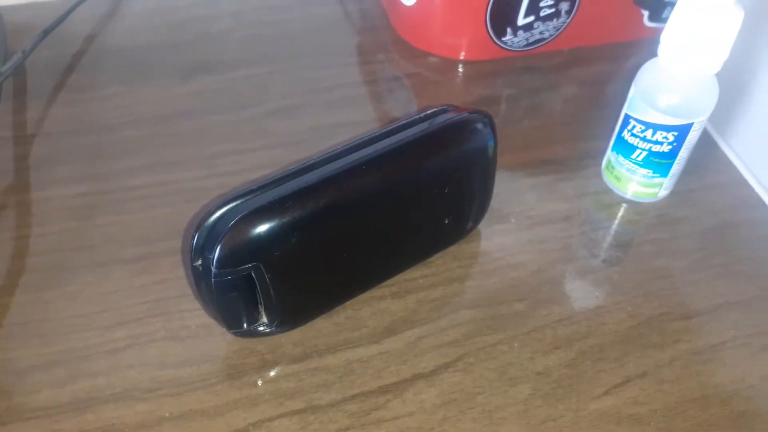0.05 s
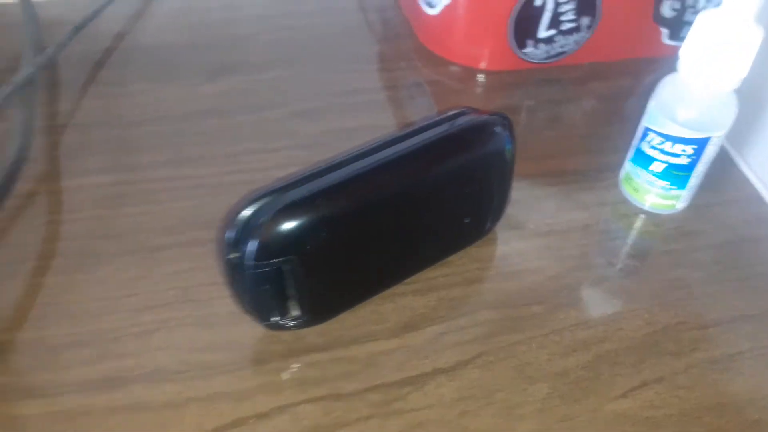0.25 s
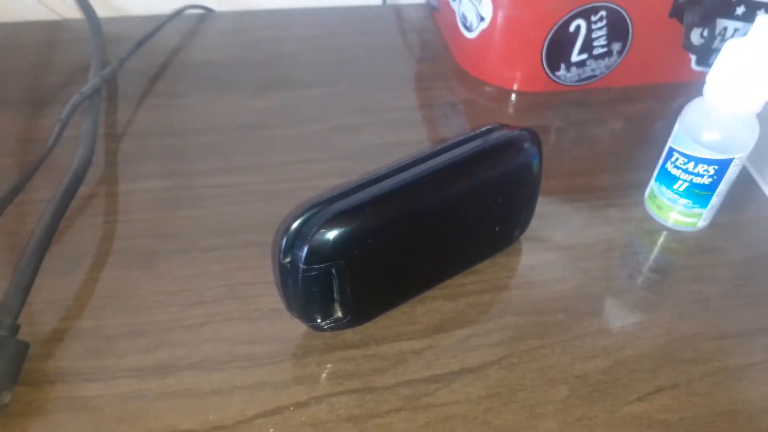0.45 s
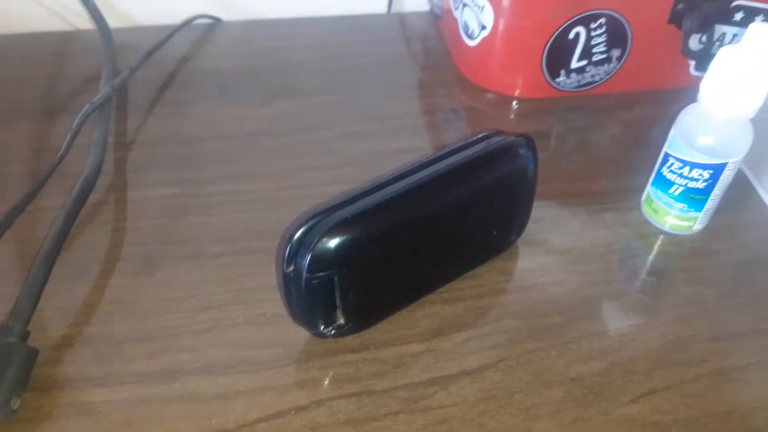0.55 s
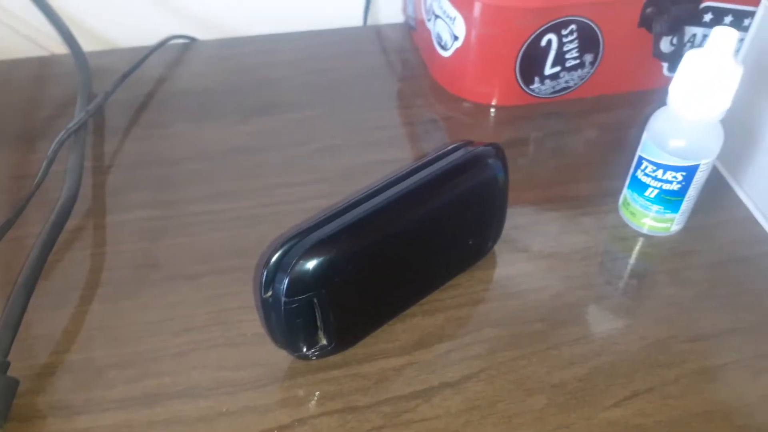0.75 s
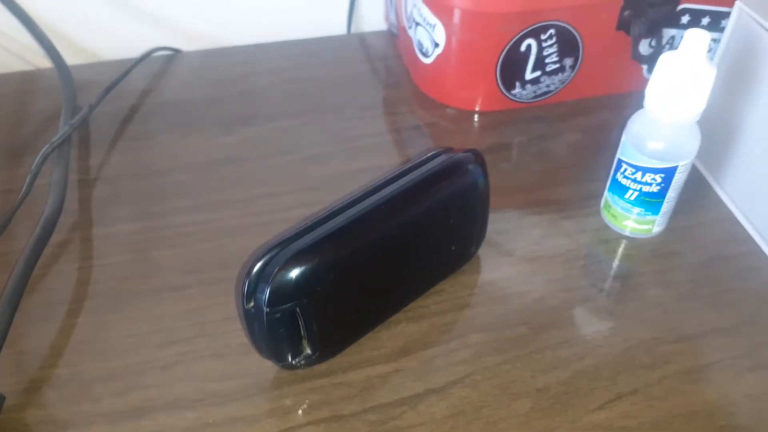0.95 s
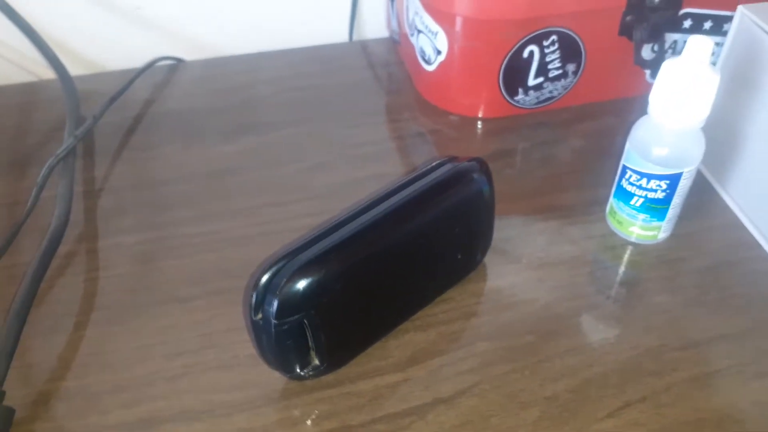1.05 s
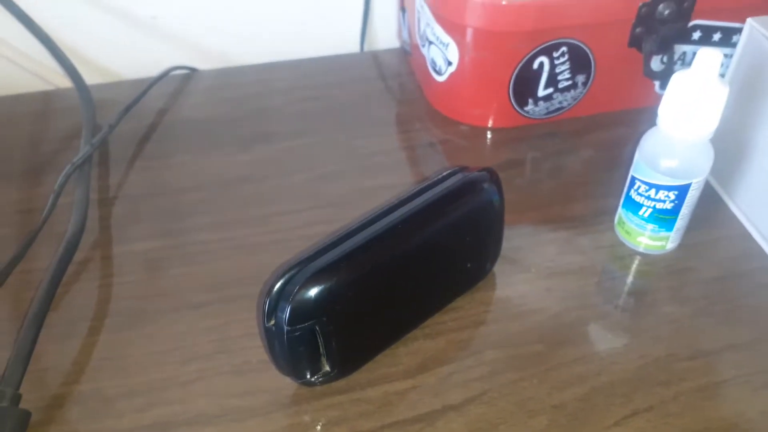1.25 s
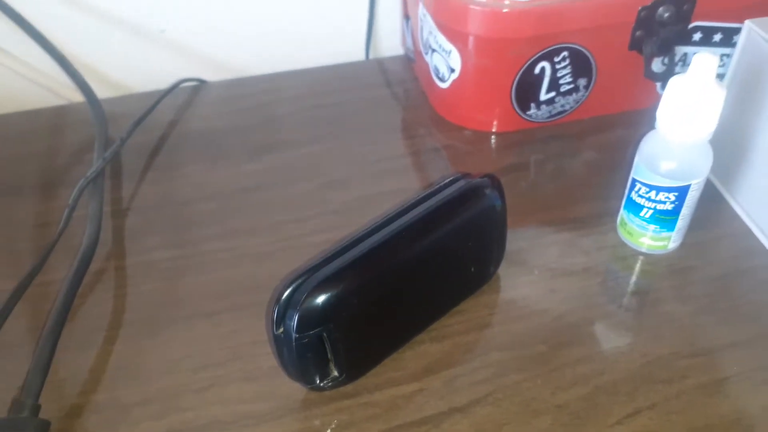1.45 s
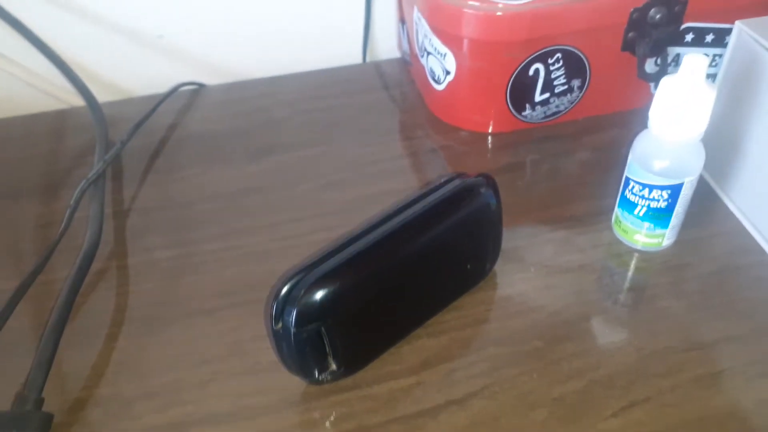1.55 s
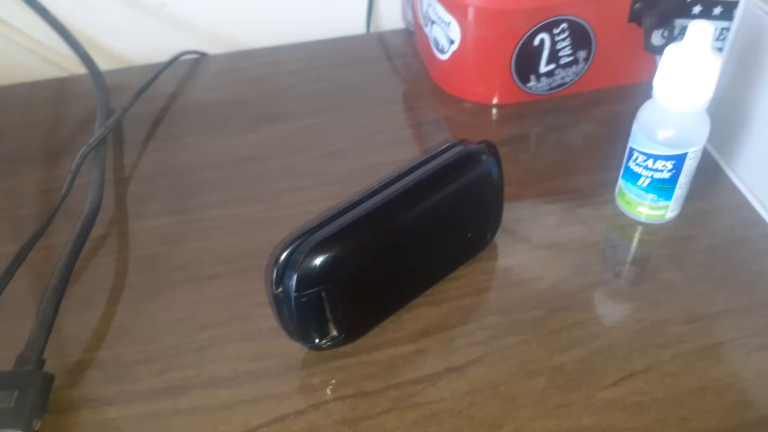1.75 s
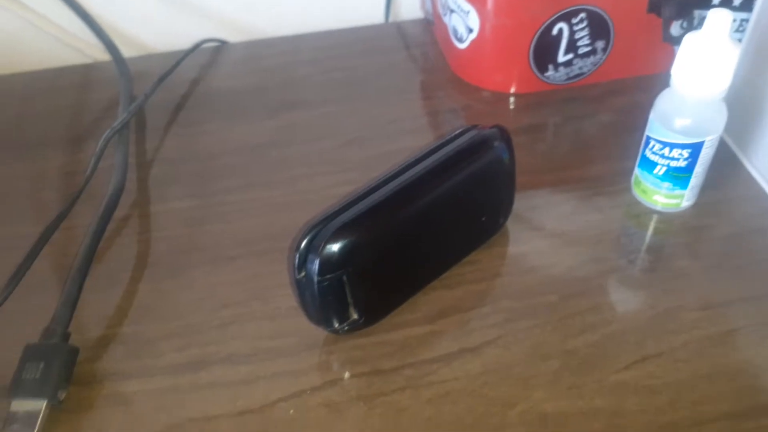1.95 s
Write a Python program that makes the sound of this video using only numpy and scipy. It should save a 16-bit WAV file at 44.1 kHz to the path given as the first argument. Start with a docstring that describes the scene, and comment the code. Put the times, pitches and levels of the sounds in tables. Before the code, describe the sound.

A phone vibrates on a wooden table with a low hum and light plastic rattle, and a sharp knock hits the wood. The buzz winds down, pauses, then returns with a second knock, heard close in a quiet small room.

```python
"""A plastic phone vibrates on a wooden table in a small room, coasts to a stop, then starts again.
Its off-centre motor is a rotating unbalance: it forces the tabletop to hum and rumble, and the case
to chatter once per turn, while the brushes hiss during each change of speed.
Two sharp knocks excite the free vibration of the wood and briefly fill the room with reverberation.
A quiet room tone lies beneath."""
import sys
import numpy as np
from scipy import signal
from scipy.fft import rfft, irfft
from scipy.io import wavfile

SR = 44100
rng = np.random.default_rng(int(sys.argv[2]) if len(sys.argv) > 2 else 0)


def materialize(psi):
    """Save the field psi as 16-bit PCM at rate SR to the path in sys.argv[1].

    A 1-D psi becomes a single channel; in a 2-D psi each row is a channel.
    """
    bounded = np.clip(np.atleast_2d(psi).T, -1, 1)
    quanta = np.round(bounded * 32767).astype(np.int16)
    wavfile.write(sys.argv[1], SR, quanta)


N = 88200
TIME = np.arange(N) / SR

# runs of the motor: (on [s], off [s], hum drive [dB], overtones [dB], chatter [dB])
MOTOR_RUNS = [(-.5, .7, -36, -54.5, -57.5), (1.642, 2.3, -42.5, -56, -58.5)]
# drift of the motor's full speed: (time [s], speed [turns/s])
FULL_SPEED = [(0, 230), (.045, 231.8), (.19, 231.7), (.36, 230.4), (.44, 229.2), (.53, 229.6), (.63, 232.2),
              (.69, 229.5), (1.7, 237), (1.84, 236.4), (2, 235.5)]
# overtones of the shaking: (multiple of the speed [1], level [dB])
HARMONICS = [(2, 0), (3, -9.5), (4, -17.5), (5, -37.5)]
# spectrum of the shaken table: (frequency [Hz], level [dB])
RUMBLE_SPECTRUM = [(35, -28), (60, -7.5), (115, -1), (170, -1), (330, -4.5), (480, -7.5), (800, -20),
                   (1500, -35)]
# spectrum of the chattering case: (frequency [Hz], level [dB])
CASE_SPECTRUM = [(600, -25.5), (1100, -12), (1400, -13), (1700, -5.5), (2090, 7.5), (2500, -4.5),
                 (3300, -1.5), (5000, -9.5), (7800, -7), (9200, -21.5), (10500, -28.5), (12500, -15),
                 (16000, -16.5)]
# resonances of the case: (frequency [Hz], bandwidth [Hz], level [dB])
CASE_RESONANCES = [(1890, 90, -13.5), (2113, 150, -11), (2600, 120, -13), (3237, 75, -14),
                   (3430, 110, -13.5), (3810, 110, -18), (4370, 290, -19.5), (4880, 480, -17.5),
                   (6540, 200, -19), (8430, 170, -22)]
# balance of the case: (frequency [Hz], left over right [dB])
CASE_BALANCE = [(700, -3), (1300, -9), (2300, -1), (4400, -10), (8000, -8), (13000, 2.5)]
# swell of the chatter: (time [s], level [dB])
CHATTER_SWELL = [(0, 3), (.16, 4.5), (.36, 1), (.5, 0), (.6, 2.5), (.7, 0.5), (1.84, 0.5), (2, -3)]
# spectrum of the motor brushes: (frequency [Hz], level [dB])
BRUSH_SPECTRUM = [(600, -20.5), (2000, -15), (3000, -1.5), (4500, -3), (7000, 6), (8200, -1), (9800, -25),
                  (13000, -6), (16000, -24)]
# spectrum of the room tone: (frequency [Hz], level [dB])
ROOM_TONE_SPECTRUM = [(18, -48.5), (30, -23.5), (41, -13), (75, -2), (199, -14), (245, -21), (336, -4),
                      (415, -14.5), (616, -20.5), (721, -38), (2610, -33.5), (3870, -39), (16000, -45.5)]
# likeness of diffuse sound at the two ears: (frequency [Hz], coherence [0-1])
COHERENCE = [(100, 0.8), (350, .85), (700, 0), (1500, 0.1), (3000, 0.09)]
# knocks: (time [s], thud and modes [dB], thud frequency [Hz], crack [dB], room [dB])
IMPACTS = [(0.2212, -2.5, 266.8, -14.5, -21), (1.6947, -1.5, 241.3, -15.5, -15)]
# modes of the table: (frequency [Hz], level [dB], T60 [s])
TABLE_MODES = [(95.33, -21, 0.15), (139.7, -27.5, .2), (287.6, -26, .11), (368.4, -21.5, 0.21),
               (466.5, -2, 0.027), (491, -24.5, .27), (586.5, -20, 0.082), (696, -22, 0.072),
               (1176, -34, 0.16), (1506, -23.5, 0.037), (1790, -28.5, 0.1), (2637, -19.5, 0.044),
               (3736, -34.5, 0.1)]
# crack of the contact: (frequency [Hz], level [dB], T60 [s])
CRACK_DECAY = [(60, -30, .04), (300, -10, 0.068), (700, 2, .04), (1500, 7, 0.032), (2310, -2.5, 0.027),
               (2800, 8.5, 0.023), (4540, 0, 0.018), (7330, -4, 0.019), (9600, -34.5, 0.037),
               (14000, -14.5, 0.02), (16000, -22, .012)]
# balance of the crack: (frequency [Hz], left over right [dB])
CRACK_BALANCE = [(1200, -1), (2800, -4.5), (7000, -4.5), (11000, 6.5)]
# reverberation of a knock: (frequency [Hz], level [dB], T60 [s])
ROOM_DECAY = [(40.3, -16, 0.13), (80, 4.5, .3), (180, 2.5, 0.084), (295, 14, 0.24), (497, 4.5, .25),
              (790, -12, 0.34), (1500, -6.5, 0.29), (2830, -12.5, .23), (4430, -19.5, 0.23),
              (7526, -25, .2), (9300, -47, 0.32), (15000, -36, .16)]

SPIN_UP_S, COAST_S = 0.029, 0.18
# each amplitude grows as speed to this power
HUM_POWER, OVERTONE_POWER, CHATTER_POWER, BRUSH_POWER = 7.6, 2.44, 2.54, 0.21
TABLETOP_HZ, TABLETOP_WIDTH_HZ = 225.9, 22
WHINE_MULTIPLE, WHINE_HZ, WHINE_WIDTH_HZ, WHINE_DB = 9, 2141, 110, -10.5
TAP_SPREAD_DB, TAP_JITTER_S, CASE_T60_S, SCRAPE_DB = 2.8, .000011, .028, -3
RUMBLE_DB, BRUSH_DB = -53.5, -61.5
ROOM_TONE_DB, ROOM_TONE_PAN_DB = -64, -7.5
THUD_LAG_S, THUD_SWELL_S, THUD_T60_S = .0013, .003, 0.069
CONTACT_S, ROOM_BUILD_S = 0.00082, 0.0034
KNOCK_PAN_DB, RIGHT_LAG_S = -2.5, 0.00022
LOW_CUT_HZ, HIGH_CUT_HZ = 55, 16000


def from_db(db):
    """Amplitude ratio: a factor of ten per 20 dB."""
    return 10 ** (np.asarray(db) / 20)


def unit_rms(x):
    """Normalisation to unit mean power."""
    return x / np.sqrt(np.mean(x ** 2) + 1e-20)


def at_hz(points, hz, column=1):
    """Interpolation of a table column over log frequency."""
    table = np.array(points, float)
    return np.interp(np.log(np.maximum(hz, 1)), np.log(table[:, 0]), table[:, column])


def pan(db):
    """Interaural level difference as left and right gains."""
    return from_db(np.array([[.5], [-.5]]) * db)


def fade(age, t60):
    """Damping: exponential decay by 60 dB in t60 seconds."""
    return np.exp(-np.log(1000) * age / t60)


def colour(x, spectrum):
    """Zero-phase filtering by multiplication of spectra."""
    hz = np.arange(N + 1) * SR / (2 * N)
    return irfft(rfft(x, 2 * N) * from_db(at_hz(spectrum, hz)))[..., :N]


def place(x, balance):
    """Interaural level difference that varies with frequency."""
    return np.array([colour(side, [(hz, share * db) for hz, db in balance])
                     for side, share in zip(x, (.5, -.5))])


def diffuse_noise(spectrum):
    """Diffuse field: coloured noise, coherent between the ears at long wavelengths; rms 1."""
    coherence = np.clip(at_hz(COHERENCE, np.arange(N // 2 + 1) * SR / N), 0, 1)
    mid, side = rfft(rng.standard_normal((2, N)))
    ears = irfft(np.sqrt(1 + coherence) * mid + np.sqrt(1 - coherence) * side * [[1], [-1]])
    return unit_rms(colour(ears, spectrum))


def decaying_noise(table, age):
    """Frequency-dependent damping: each half-octave band of noise decays at its own rate."""
    spectrum = rfft(diffuse_noise(table))
    hz = np.arange(N // 2 + 1) * SR / N
    edges = 30 * 2 ** np.arange(0, 10, .5)
    sound = 0
    for low, high in zip(edges, edges[1:]):
        band = irfft(spectrum * ((hz >= low) & (hz < high)))
        sound += band * fade(age, at_hz(table, np.sqrt(low * high), column=2))
    return sound * (age > 0)


def resonate(x, hz, width_hz):
    """Forced response of a damped oscillator, with unit gain at resonance."""
    radius = np.exp(-np.pi * width_hz / SR)
    feedback = [1, -2 * radius * np.cos(2 * np.pi * hz / SR), radius ** 2]
    return signal.lfilter(np.array([1, 0, -1]) * (1 - radius ** 2) / 2, feedback, x + 1e-18)


def tabletop_hum(turns, spin):
    """Forced vibration: the rotating unbalance drives a resonance of the tabletop."""
    force = np.sqrt(2) * np.sin(2 * np.pi * turns) * spin ** HUM_POWER
    return resonate(force, TABLETOP_HZ, TABLETOP_WIDTH_HZ)


def shaking_overtones(turns):
    """Harmonics of periodic shaking; a high one excites a resonance of the shell, which whines."""
    phase = 2 * np.pi * turns
    harmonics = np.sqrt(2) * sum(from_db(db) * np.sin(k * phase) for k, db in HARMONICS)
    whine = resonate(np.sin(WHINE_MULTIPLE * phase), WHINE_HZ, WHINE_WIDTH_HZ)
    return harmonics + from_db(WHINE_DB) * whine


def case_chatter(turns):
    """Periodic impact: the case taps the table once a turn, rings, and scrapes in between; rms 1."""
    taps = np.interp(np.arange(1, int(turns[-1])), turns, np.arange(N))
    jitter, strength = rng.standard_normal((len(taps), 2)).T
    near = taps.astype(int)[:, None] + np.arange(-8, 9)
    offset = near - (taps + TAP_JITTER_S * SR * jitter)[:, None]
    pulses = np.sinc(offset) * from_db(TAP_SPREAD_DB * strength[:, None])  # taps fall between samples
    clicks = np.zeros(N)
    np.add.at(clicks, np.clip(near, 0, N - 1), pulses)
    response = rng.standard_normal((2, SR // 10)) * fade(TIME[:SR // 10], CASE_T60_S)
    ringing = unit_rms(colour(signal.fftconvolve(clicks[None], response)[:, :N], CASE_SPECTRUM))
    scrape = unit_rms(diffuse_noise(CASE_SPECTRUM) * (1 + .25 * np.cos(2 * np.pi * turns)))
    modes = sum(from_db(db) * unit_rms(resonate(resonate(clicks, hz, width), hz, 2 * width))
                for hz, width, db in CASE_RESONANCES)
    return unit_rms(place(ringing + from_db(SCRAPE_DB) * scrape + modes, CASE_BALANCE))


def brush_hiss(spins):
    """Sliding friction of the brushes, heard while the motor speeds up or coasts."""
    # the hiss dies away below a fifth of full speed
    envelope = sum(np.tanh(spin / .2) * spin ** BRUSH_POWER * np.sqrt(np.maximum(1 - spin, 0))
                   for spin in spins)
    return from_db(BRUSH_DB) * diffuse_noise(BRUSH_SPECTRUM) * envelope


def phone():
    """Rotor inertia: the motor spins up and coasts down, and every sound it drives follows its speed."""
    # share of full speed in each run
    spins = [(1 - np.exp(-np.maximum(TIME - on, 0) / SPIN_UP_S))
             * np.clip(1 - (TIME - off) / COAST_S, 0, 1) for on, off, *_ in MOTOR_RUNS]
    pitch_share = np.maximum(sum(spins), .5)  # the pitch falls an octave at most
    turns = np.cumsum(np.interp(TIME, *np.transpose(FULL_SPEED)) * pitch_share) / SR
    overtones = shaking_overtones(turns)
    chatter = case_chatter(turns) * from_db(np.interp(TIME, *np.transpose(CHATTER_SWELL)))
    sound = brush_hiss(spins)
    rumble = from_db(RUMBLE_DB) * diffuse_noise(RUMBLE_SPECTRUM)
    for spin, (_, _, hum_db, overtone_db, chatter_db) in zip(spins, MOTOR_RUNS):
        sound += from_db(hum_db) * tabletop_hum(turns, spin)
        sound += (from_db(overtone_db) * overtones + rumble) * spin ** OVERTONE_POWER
        sound += from_db(chatter_db) * chatter * spin ** CHATTER_POWER
    return sound


def room_tone():
    """Ambient noise: a steady diffuse field, stronger on the right."""
    return from_db(ROOM_TONE_DB) * pan(ROOM_TONE_PAN_DB) * diffuse_noise(ROOM_TONE_SPECTRUM)


def table_ring(age):
    """Free vibration: the table's damped modes build up over the contact time."""
    modes = sum(from_db(db) * np.sin(2 * np.pi * hz * age) * fade(age, t60)
                for hz, db, t60 in TABLE_MODES)
    return modes * (1 - np.exp(-age / CONTACT_S))


def table_thud(age, hz):
    """Propagation delay: slow bending waves bring the deep thud late."""
    since_arrival = np.maximum(age - THUD_LAG_S, 0)
    swell = 1 - np.exp(-since_arrival / THUD_SWELL_S)
    return np.sin(2 * np.pi * hz * since_arrival) * fade(since_arrival, THUD_T60_S) * swell


def knock(start, wood_db, thud_hz, crack_db, room_db):
    """Impulsive excitation: a hard contact cracks, the wood rings and thuds, the room reverberates."""
    age = np.maximum(TIME - start - np.array([[0], [RIGHT_LAG_S]]), 0)
    wood = from_db(wood_db) * (table_ring(age) + table_thud(age, thud_hz))
    crack = from_db(crack_db) * place(decaying_noise(CRACK_DECAY, age), CRACK_BALANCE)
    room = from_db(room_db) * decaying_noise(ROOM_DECAY, age) * (1 - np.exp(-age / ROOM_BUILD_S))
    return pan(KNOCK_PAN_DB) * (room - wood) + crack


def scene():
    """Superposition of the phone, the knocks and the room tone."""
    return phone() + sum(knock(*impact) for impact in IMPACTS) + room_tone()


def record(dry):
    """Band limiting and clipping: deep bass is thinned, peaks stop at full scale, the top is cut."""
    high_pass = signal.butter(4, LOW_CUT_HZ, "high", fs=SR, output="sos")
    low_pass = signal.ellip(10, .1, 80, HIGH_CUT_HZ, fs=SR, output="sos")
    clipped = np.clip(signal.sosfilt(high_pass, dry), -1, 1)
    return signal.sosfilt(low_pass, clipped)


dry = scene()
out = record(dry)
materialize(out)
```